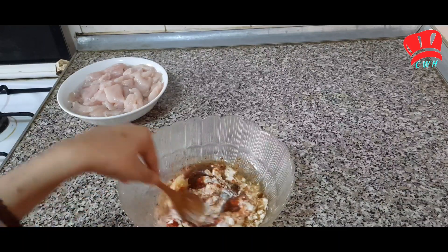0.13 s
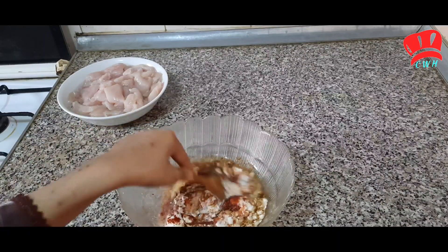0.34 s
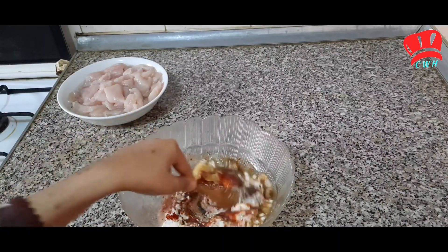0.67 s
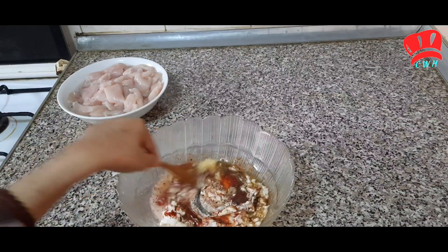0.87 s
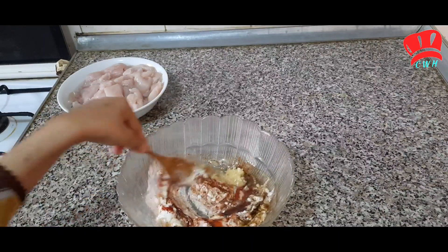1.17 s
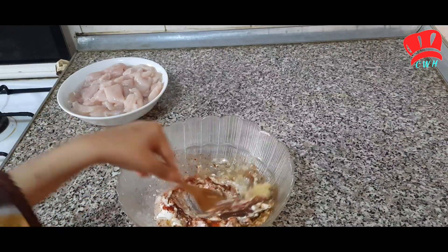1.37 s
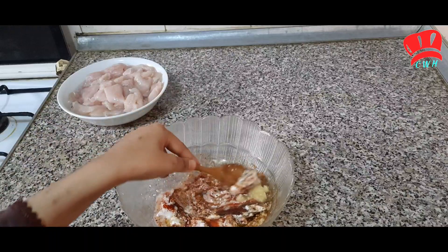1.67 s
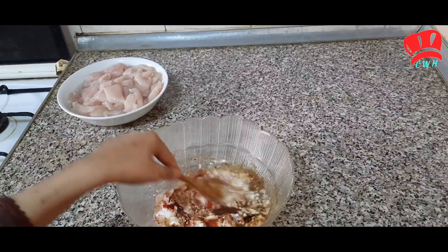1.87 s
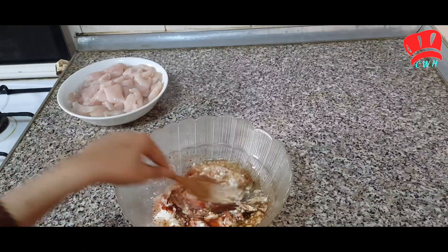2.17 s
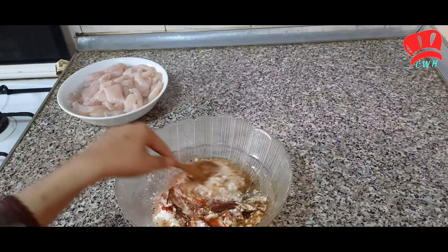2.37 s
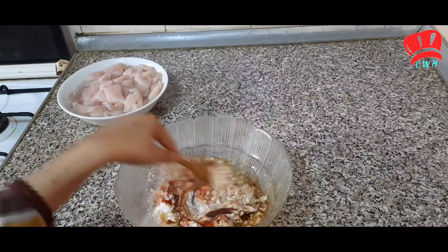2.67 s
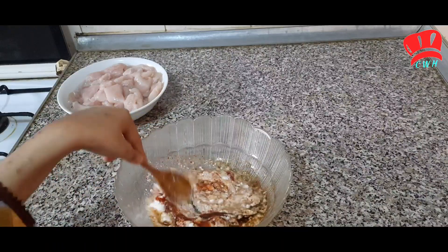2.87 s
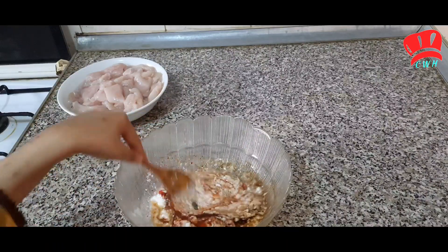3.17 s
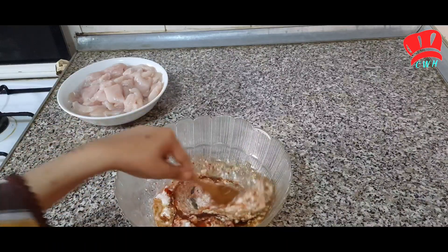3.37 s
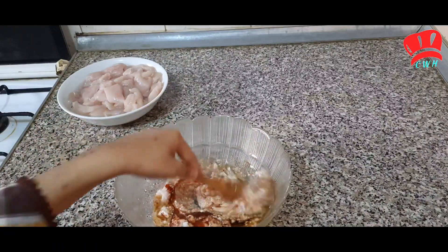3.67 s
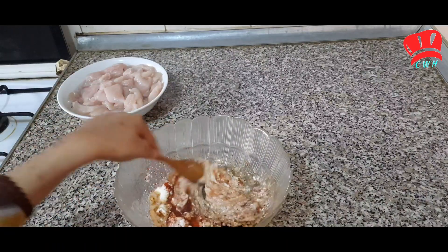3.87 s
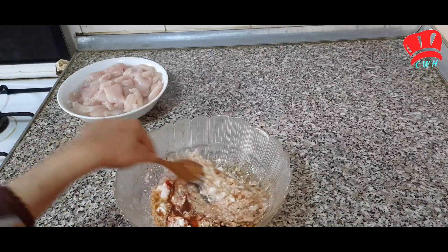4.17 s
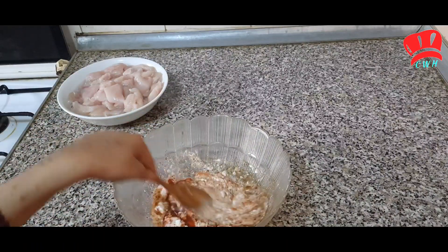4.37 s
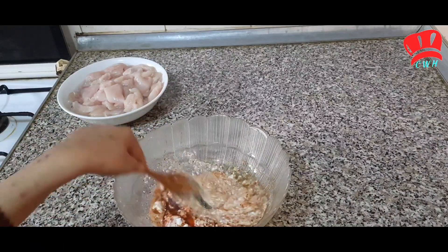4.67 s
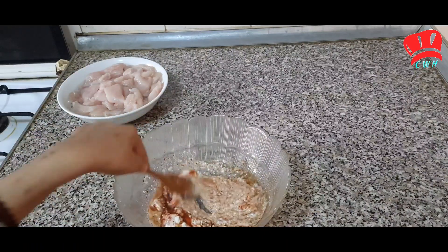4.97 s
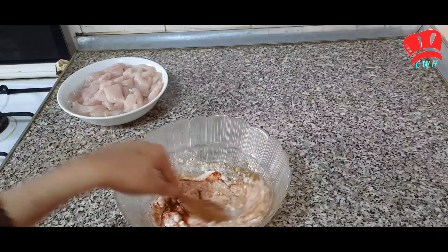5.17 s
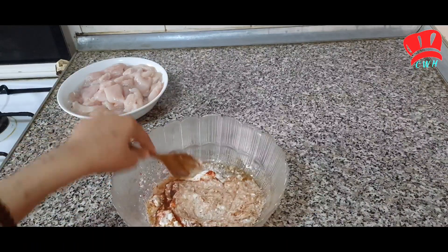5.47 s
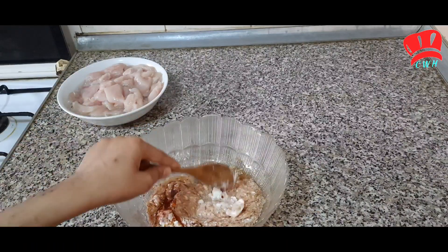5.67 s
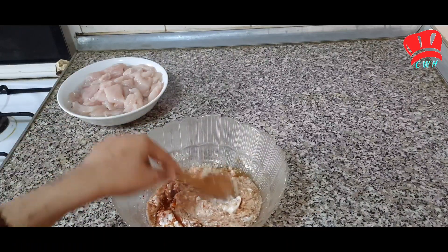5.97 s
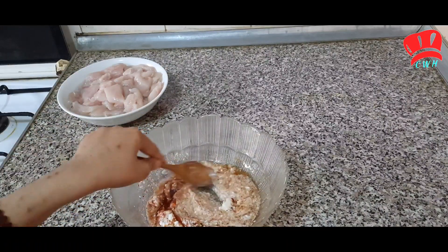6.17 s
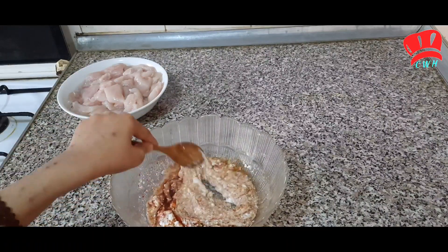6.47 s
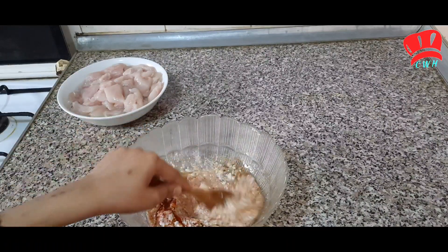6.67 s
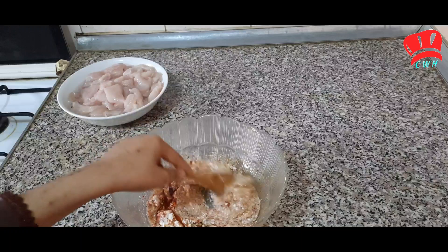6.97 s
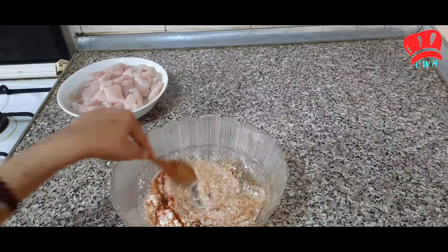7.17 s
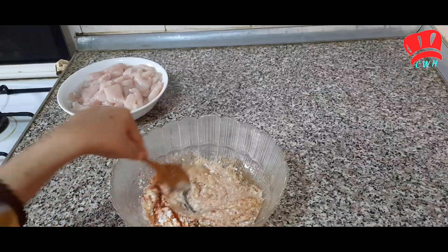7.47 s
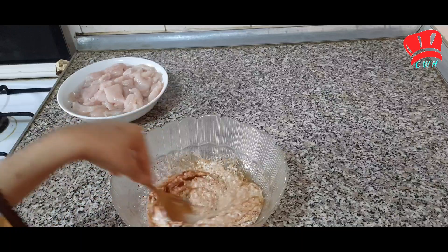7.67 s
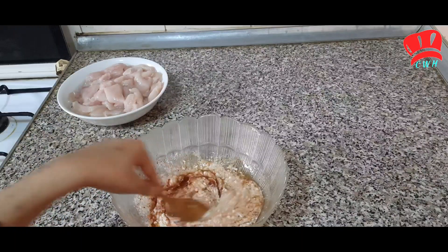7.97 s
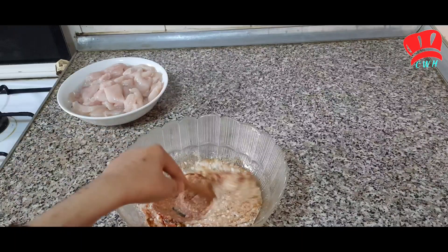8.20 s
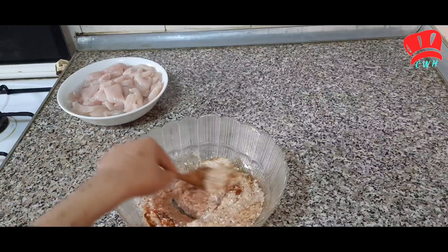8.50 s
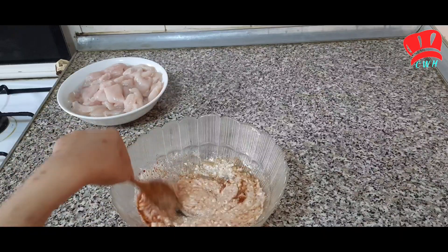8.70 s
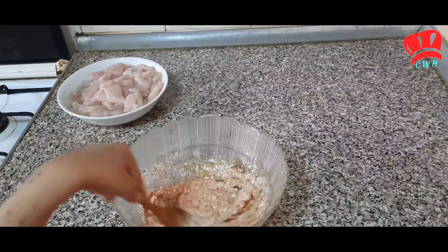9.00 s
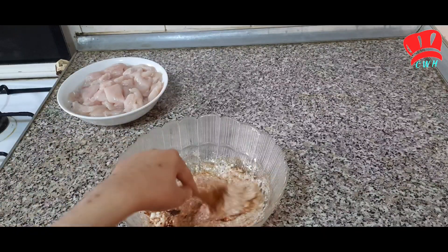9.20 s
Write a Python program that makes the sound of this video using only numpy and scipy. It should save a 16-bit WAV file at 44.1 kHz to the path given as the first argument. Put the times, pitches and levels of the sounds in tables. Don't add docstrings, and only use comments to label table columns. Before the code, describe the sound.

Wet, gluey stirring heard from very near: the spoon drags, fizzes and slaps through marinade, tearing sticky strands and popping air pockets, with tiny gritty clicks on the glass. The bowl bumps softly on the counter throughout, with a heavy knock at about five and a half seconds, then lighter stirring to the end. Short kitchen reflections, low mains hum and a very faint high whine surround it.

```python
import sys
import numpy as np
from scipy import signal
from scipy.fft import rfft, irfft, next_fast_len
from scipy.io import wavfile
from scipy.ndimage import uniform_filter1d

SR = 44100
rng = np.random.default_rng(int(sys.argv[2]) if len(sys.argv) > 2 else 0)


def amp(db):
    return 10 ** (np.asarray(db, float) / 20)


def write(x):
    x = np.atleast_2d(x).T
    wavfile.write(sys.argv[1], SR, np.round(np.clip(x, -1, 1) * 32767).astype(np.int16))


N = 411894

# [pitch_hz, density_db]
AIR = [(30, -25), (58, 6.5), (80, -6), (102, 13), (125, -3.5), (197, -6.5), (325, 3.5), (484, -5.5),
       (637, 0.5), (926, -11.5), (1600, -14), (2510, -17.5), (5500, -20), (13700, -25), (15500, -22.5)]
AIR_DB, MAINS_DB, WHINE_DB = -62, -69, -84.5
MAINS_HZ, WHINE_HZ, WHINE_ENDS_S = 100, 13873, 6.9

# [pitch_hz, likeness (1 = same)]
PORT_LIKENESS = [(60, 0.83), (180, 0.93), (550, 0.1), (1650, -2.4), (4970, -1), (15000, -0.37)]
# [pitch_hz, t60_s]
KITCHEN_DECAY = [(100, 0.15), (700, 0.35), (1840, 0.29), (4850, 0.23), (12800, 0.17)]
# [delay_s, level_db]
WALL_ECHOES = [(.0055, -2.5), (.009, -10.5), (0.015, -60), (0.019, -49)]
BUNCH_S, BUNCH_DB = 0.024, 2.5

# [pitch_hz, level_db, t60_s]
COUNTER_MODES = [(106.7, 6.5, 0.12), (155.4, 3, 0.13), (237.6, 2, 0.093), (310, -2, 0.21),
                 (380.2, 1, 0.098), (533, -25, 0.15), (651.5, -17.5, 0.1), (717, -25.5, 0.29),
                 (831, -25.5, 0.14), (964, -35.5, 0.43), (1500, -34, 0.24), (2230, -33.5, 0.15)]
# [start_s, peak_db, loudest_pitch_hz, hardness_db, depth_db]
BUMPS = [(0.339, -42.5, 310, -26, -32), (0.661, -33, 128, -16, -17), (0.976, -37, 200, -18, -26),
         (1.363, -40.5, 430, 5, -8), (1.602, -42, 152, 7, -6), (2.141, -22.5, 160, -16, -23),
         (2.441, -32, 250, -14.5, -34), (2.742, -33.5, 133, -36, -51), (2.765, -25, 148, -19.5, -18),
         (3.06, -39, 165, -6.5, -22), (3.383, -43, 135, -16, -12), (3.706, -30.5, 104, -11, -4),
         (3.991, -40.5, 290, -7, -10), (4.177, -41.5, 130, 0, -27), (5.556, -15.5, 161, -17, -41),
         (5.577, -25.5, 238, -18, -25), (5.842, -43.5, 383, -13, -22), (6.372, -41.5, 125, -24, -13),
         (7.267, -36.5, 146, -3, -20), (8.255, -34, 385, -2, -9), (8.299, -33.5, 141, 12, -10),
         (8.918, -31, 249, -1, -52)]
# [start_s, peak_db]
NUDGES = [(0.103, -44.5), (0.697, -32), (0.721, -33), (1.04, -51), (1.291, -45), (2.65, -42), (2.91, -46),
          (3.219, -41), (3.312, -35.5), (3.884, -43.5), (4.332, -37.5), (4.595, -36.5), (4.877, -40.5),
          (5.15, -31.5), (7.981, -45.5), (8.446, -37)]
NUDGE_HZ, NUDGE_HARD_DB, NUDGE_DEEP_DB = 105, -31.5, -6
NUDGE_S = 0.0211
DIP_HZ, DIP_Q = 77.5, 2.85

# [pitch_hz, density_db]
ROCKING = [(40, -43), (58, -37), (80, -10), (105, -2), (150, -10.5), (195, -10), (235, -23), (305, -6),
           (480, -17), (650, -17.5), (900, -33), (1400, -69)]
# [start_s, level_db]
SHIFTS = [
    (0.699, -53),
    (2.155, -38),
    (5.575, -31.5),
    (8.946, -41.5),
    (9.251, -61),
]
SETTLE_S, SWAY_DB = 0.028, -73.5

# [pitch_hz, width_hz, level_db]
BOWL_MODES = [(888, 600, 1.5), (1560, 600, 2.5), (2000, 160, -47), (2190, 410, 1.5), (3650, 605, 2.5),
              (5120, 1360, -2.5)]
# [pitch_hz, density_db]
FIZZ = [(2500, -8), (4000, -1), (6500, 11.5), (10000, 4.5), (14000, 8.5), (16000, -36)]
# [full_effort_s, drag_db, drag_pitch_hz, fizz_db, ease_off_s]
STROKES = [(0.1, -53, 1870, -63, 0.21), (0.7, -59.5, 1710, -61, 1), (1.115, -60, 1610, -61, 0.31),
           (1.46, -58, 1510, -57.5, 0.12), (1.648, -85, 1500, -79, 0.054), (2.143, -41, 1500, -53, 0.069),
           (2.441, -55, 1840, -67, 0.6), (2.729, -54.5, 1690, -62, 1), (3.03, -60, 2680, -53, 0.098),
           (3.101, -56, 1630, -69, 0.97), (3.6, -58, 2130, -64, 0.6), (4.01, -56, 2100, -78, 0.79),
           (4.44, -65, 2200, -58, 0.31), (4.69, -56, 2000, -53.5, 0.4), (5.172, -52, 1980, -48, 0.042),
           (5.557, -47.5, 1640, -105, 0.07), (6.134, -51, 1500, -48.5, 0.081),
           (6.376, -46, 1660, -74, 0.07), (6.842, -62, 1560, -78, 0.48), (6.96, -56.5, 1570, -58.5, 0.21),
           (7.21, -106.5, 1420, -53.5, 0.4), (7.938, -58.5, 2350, -59, 0.54), (8.27, -49, 2000, -56, 0.21),
           (8.699, -58, 1420, -84, 0.9), (8.935, -52.5, 2580, -49, 0.048), (9.287, -55, 1460, -77, 0.66)]
DIG_S, EASE_DB = 0.012, 13.5
IDLE_DRAG_DB, IDLE_FIZZ_DB = -88, -84
LUMPS_DB = 3
# [start_s, length_s, level_db, from_hz, to_hz]
SLIDES = [(1.107, 0.088, -63, 1310, 2420), (1.336, 0.16, -66, 1500, 1540), (1.486, 0.09, -66, 1600, 1510),
          (2.71, 0.25, -70, 1450, 1680), (2.79, 0.19, -74, 2280, 2230), (3.024, 0.029, -63, 2700, 2240),
          (3.067, .07, -62, 1750, 1500), (3.15, 0.12, -67, 1400, 1690), (5.546, 0.054, -56, 2200, 2220),
          (6.359, .09, -53, 1980, 1930), (6.388, 0.061, -53, 1520, 1440), (6.67, 0.1, -74, 2300, 2400),
          (6.82, 0.054, -53.5, 1950, 1860), (7.33, 0.34, -77.5, 2430, 2270), (7.595, 0.46, -76, 2580, 2170),
          (0.993, 0.17, -71, 2190, 2160)]
SLIDE_WIDTH_HZ, SLIDE_SKEW = 430, 0.73

# [start_s, peak_db, pitch_hz, left_minus_right_db]
CRACKLES = [(0.1337, -39.5, 2300, 2.5), (0.2474, -45.5, 5220, 4), (0.4658, -38.5, 3550, -1),
            (0.7984, -44, 2420, 8), (0.8866, -57, 2320, 9), (0.9667, -51, 3730, 25.5),
            (0.9966, -45, 6650, 9), (1.285, -53, 2290, -1), (1.3119, -58, 3300, -7),
            (1.3644, -39, 2230, -7), (1.419, -51, 2190, 16.5), (1.5, -47.5, 2800, -3),
            (2.5003, -59, 3510, 0), (2.5222, -41, 2100, -2), (2.632, -61, 1940, -3),
            (2.649, -58, 1910, 0.5), (2.7474, -54, 1800, 2.5), (2.8474, -44, 2300, 0.5),
            (2.9694, -52, 2230, 4), (3.1283, -46, 2370, 2.5), (3.1687, -48, 1960, 4),
            (3.2703, -40, 2650, 1.0), (3.3149, -47, 4000, 20), (3.4062, -48, 2600, 2.0),
            (3.566, -47.5, 1880, -4), (3.7224, -58, 2180, -1), (4.409, -46, 1980, 3.5),
            (4.4644, -40.5, 1980, 1.5), (4.6125, -37.5, 2430, -1), (4.7314, -40, 2250, -4),
            (4.9744, -47, 1760, 2.0), (5.1312, -47, 5960, 0.5), (5.18, -43.5, 2120, -13),
            (5.5268, -83, 2210, -3), (6.1735, -35.5, 1630, 8), (6.1864, -44, 2140, 6),
            (7.0294, -73, 2230, 2.0), (7.0563, -48.5, 2660, 9), (7.8624, -49, 2120, -34),
            (8.2317, -47, 2530, -5), (8.324, -35, 2540, 6), (8.3377, -56, 2620, 2.5),
            (8.37, -38.5, 3200, 2.0), (8.6435, -50, 2300, -1), (8.8039, -49, 2440, 6.5),
            (8.8661, -47.5, 2620, 1), (8.9007, -49, 2295, 0), (9.0194, -61, 2480, 12),
            (9.2407, -47.5, 3200, -2.5)]
# [start_s, peak_db, pitch_hz, left_minus_right_db]
MORE_CRACKLES = [
    (1.42, -38.5, 5400, 0),
    (1.5, -49, 2900, 1),
    (5.6, -55, 3460, 1),
    (2.631, -41.5, 5600, -1),
    (6.8262, -29.5, 3550, -2),
    (7.385, -50, 5100, 3),
    (8, -47.5, 7100, -1),
]
CRACKLE_CYCLES, CRACKLE_SNAP_DB = 1.9, 5.5
# [start_s, peak_db, pitch_hz]
SPITS = [(0.227, -47, 9800), (0.26, -44.5, 10600), (0.4534, -46, 8400), (0.5173, -46, 11400),
         (0.7736, -43.5, 12800), (1.1787, -43, 10900), (1.8394, -53.5, 9220), (2.4987, -46.5, 9640),
         (2.536, -40.5, 8310), (2.6494, -43.5, 11600), (2.7207, -49, 11800), (2.804, -49, 10600),
         (3.1692, -64, 8510), (3.27, -41, 12300), (3.2944, -47, 8110), (3.338, -52, 6500),
         (3.3822, -46.5, 6580), (3.459, -48, 6900), (3.6244, -58, 8750), (3.6844, -52, 7680),
         (3.707, -48, 12400), (3.7594, -48.5, 6850), (3.9055, -51, 10700), (4.4624, -49, 9400),
         (4.9496, -51, 11400), (4.9744, -57, 9680), (5.5268, -47, 11400), (5.818, -54, 11900),
         (5.8794, -52.5, 7290), (6.877, -51, 8340), (6.9531, -49, 11200), (7.0, -48, 10700),
         (7.0294, -55, 10700), (7.0594, -45, 9700), (7.2335, -46, 12900), (7.2604, -47, 12100),
         (7.456, -65, 10500), (7.554, -55, 11100), (7.6271, -56.5, 7580), (7.8157, -52.5, 9100),
         (7.862, -51, 7840), (7.9334, -50, 8580), (7.9693, -46, 11400), (8.324, -42, 8160),
         (9.148, -52, 11500), (9.248, -50, 8040)]
# [start_s, peak_db, pitch_hz]
FILMS = [(0.0861, -47, 9600), (1.041, -43, 12300), (1.103, -48, 9900), (1.3278, -45.5, 11100),
         (1.652, -51, 9000), (1.8936, -48, 14650), (2.1296, -39.5, 9100), (2.623, -48, 11000),
         (2.6993, -48, 8240), (2.9334, -45, 10600), (3.2181, -42, 9000), (3.5783, -48.5, 9050),
         (3.9957, -46, 8900), (4.764, -43, 11200), (5.1642, -45, 10300), (5.6266, -46, 11000),
         (6.053, -44.5, 11700), (6.351, -55, 14400), (6.3639, -36.5, 10500), (6.7206, -48, 10400),
         (7.2, -39.5, 12800), (8.1938, -50, 11100), (8.455, -44, 13000)]
# [start_s, peak_db]
STRANDS = [(0.3454, -48.5), (0.5722, -49.5), (0.6917, -40.5), (2.1304, -43.5), (2.426, -47),
           (3.6023, -40.5), (4.017, -48), (4.179, -46), (4.22, -49), (4.2314, -43), (4.427, -47.5),
           (4.4962, -50), (4.57, -48), (4.6763, -48.5), (4.8293, -52), (6.118, -43), (6.4065, -39),
           (6.827, -85), (8.0952, -41), (8.246, -45.5), (8.431, -49), (8.689, -46.5), (8.9244, -44.5)]
STRAND_HZ = 5760

# [start_s, peak_db, pitch_hz, glass_knock_db]
POPS = [(1.101, -45, 1330, 5.5), (1.454, -41, 1480, -1.5), (2.131, -57, 700, 7), (2.536, -50.5, 1960, 11.5),
        (2.721, -52, 1450, 3), (2.897, -39, 1630, -27), (3.033, -41, 2650, -9), (3.078, -40.5, 1660, -30),
        (3.197, -41.5, 1720, -27), (3.382, -48, 1710, -6), (4.026, -47, 2190, -3), (4.093, -67, 2190, -10),
        (4.24, -39, 3880, -2), (4.43, -38, 1920, -27), (4.498, -43.5, 1590, 1), (4.575, -37, 2660, -13),
        (4.676, -43, 864, 9.5), (4.829, -39, 3200, -6), (5.164, -41, 4300, -24), (5.543, -38.5, 805, 2),
        (6.826, -33.5, 1555, -11), (6.94, -43, 1560, -7), (7.453, -43, 2600, -31), (8.924, -32, 2170, 3),
        (9.15, -48, 1400, -2.5), (9.275, -49, 1520, 4.5), (9.326, -47, 1370, 6.5)]
# [start_s, peak_db, pitch_hz, glass_knock_db]
SMACKS = [(0.088, -52.5, 1310, 10.5), (0.347, -44.5, 840, 0.5), (0.441, -53, 2580, 10),
          (0.776, -40, 1370, -2), (1.327, -44, 1580, 5), (1.469, -37.5, 1550, -8),
          (1.6383, -44.5, 1260, -2.5), (2.143, -32, 800, -6), (2.427, -48, 2250, 11),
          (3.218, -31.5, 3130, -12.5), (3.464, -41, 1190, -3), (3.585, -45.5, 1810, 2.5),
          (3.708, -40, 1250, -8), (3.752, -41, 2760, -4), (4.002, -55, 1170, 10), (4.105, -34.5, 2090, -23),
          (4.179, -35, 2300, -4), (4.764, -36, 1580, -11), (4.951, -41, 1760, -2.5),
          (5.552, -25.5, 970, -51), (5.835, -43.5, 650, -16), (6.364, -26, 1870, -14.5),
          (6.598, -40, 1430, -7.5), (7.275, -43.5, 1500, 2.5), (7.735, -55.5, 2240, 3.5),
          (8.248, -33, 2420, -4.5), (8.433, -38, 2000, -2.5), (8.661, -42.5, 1730, 3),
          (8.691, -33.5, 1660, -6)]
# [start_s, peak_db, pitch_hz, glass_knock_db, cycles]
SQUELCHES = [(0.6923, -56.5, 1590, 8, 9.7), (1.183, -38, 2400, -6, 1.3), (2.7997, -51, 1560, -25, 2.4),
             (2.924, -41, 1770, -11, 0.97), (3.051, -59, 2250, 14, 6.5), (5.913, -55, 1630, 2.5, 3.2),
             (6.117, -45, 2167, -6, 11), (6.6982, -41.5, 1280, -20, 0.33), (7.2, -46, 3930, -21, 4.5),
             (7.3343, -44, 2450, 0.5, 3.7), (7.355, -40.5, 2330, -16, 5.3), (4.347, -53.5, 2340, -1, 6),
             (7.6076, -51.5, 2750, -5, 4.4), (7.9244, -44, 2840, -1, 2), (7.9499, -45, 3100, -7, 2.4),
             (8.272, -32.5, 1696, -48, 3.9), (8.8191, -45, 2500, -25, 2.9)]
SMACK_CYCLES, POP_CYCLES = 0.79, 2.25

# [above_hz, threshold_db]
GATES = [(9000, -72), (3500, -69), (1700, -71)]
GATE_SLOPE, EDGE_HZ = 1.1, 15750


def evened(x):
    return x / np.sqrt(np.mean(x ** 2) + 1e-20)


def read(points, hz):
    f, value = np.transpose(points)
    return np.interp(np.log(hz + 1), np.log(f + 1), value)


def add(mix, s, sound):
    part = mix[..., round(s * SR):][..., :sound.shape[-1]]
    part += sound[..., :part.shape[-1]]


def colour(x, points):
    size = next_fast_len(N)
    gain = amp(read(points, np.fft.rfftfreq(size, 1 / SR)))
    return evened(irfft(rfft(x, size) * gain, size)[..., :N])


def resonate(x, hz, width):
    turn = np.exp(2j * np.pi * np.cumsum(hz * np.ones(len(x))) / SR)
    r = np.exp(-np.pi * width / SR)
    return 2 * (turn * signal.lfilter([1 - r], [1, -r], x / turn + 1e-18)).real


def left_right(db):
    return np.array([[1], [-1]]) * db


def ports(x):
    size = next_fast_len(N)
    same = np.clip(read(PORT_LIKENESS, np.fft.rfftfreq(size, 1 / SR)), 0, 1)
    left, right = rfft(x, size)
    mid = np.sqrt(1 + same) * (left + right) / 2
    side = np.sqrt(1 - same) * (left - right) / 2
    return irfft(np.array([mid + side, mid - side]), size)[:, :N]


def hush():
    t = np.arange(N) / SR
    swell = evened(sum(np.sin(2 * np.pi * (f * t + rng.random())) / np.sqrt(f)
                       for f in np.geomspace(0.2, 8, 20)))
    air = amp(AIR_DB + 0.6 * swell) * colour(rng.standard_normal((2, N)), AIR)
    hum = amp(MAINS_DB) * np.sin(2 * np.pi * MAINS_HZ * t)
    whine_db = WHINE_DB + 1.8 * swell - 21 * (t > WHINE_ENDS_S)
    whine = amp(whine_db) * np.sin(2 * np.pi * WHINE_HZ * t)
    return ports(air) + hum + whine


def kitchen(x):
    out, size = np.zeros((2, N)), SR // 2
    turn = 2 * np.pi * 1.3 * np.arange(N) / SR
    for k in range(3):
        taps = np.zeros((2, size))
        at = np.arange(40, size - 12, 12)
        at = at + rng.integers(0, 12, (2, len(at)))
        np.put_along_axis(taps, at, rng.choice([-1., 1.], at.shape), 1)
        hz, t, z = signal.stft(taps, SR, nperseg=128)
        z = z * amp(BUNCH_DB * np.cos(2 * np.pi * t / (BUNCH_S * (1 + k / 5))))
        decay_db = -60 * np.maximum(t - 0.015, 0) / read(KITCHEN_DECAY, hz)[:, None]
        tail = signal.istft(z * amp(decay_db), SR, nperseg=128)[1]
        tail = amp(5.5) * tail / np.linalg.norm(tail[0])
        for s, db in WALL_ECHOES:
            at_ports = (SR * s * rng.uniform(0.95, 1.05, 2)).astype(int)
            tail[[0, 1], at_ports] += amp(db)
        share = np.sqrt(2 / 3) * np.cos(turn + k * np.pi / 3)
        out += signal.fftconvolve((x * share)[None], tail, axes=1)[:, :N]
    lean = out[0] - signal.lfilter(*signal.butter(1, 300, fs=SR), out[0])
    out[0] += 0.29 * lean + 0.5 * resonate(out[0], 750, 350)
    return ports(out)


def bumps():
    out, t = np.zeros(N), np.arange(SR // 3) / SR
    rows = [(*row, 0) for row in BUMPS]
    rows += [(*row, NUDGE_HZ, NUDGE_HARD_DB, NUDGE_DEEP_DB, NUDGE_S) for row in NUDGES]
    phases = rng.uniform(-0.21, 0.11, (len(rows), len(COUNTER_MODES)))
    for (s, db, pitch_hz, hard_db, deep_db, rise_s), turn in zip(rows, phases):
        ring = amp(deep_db + 4.5 - 60 * t / 0.18) * np.sin(2 * np.pi * 58 * t)
        for (hz, mode_db, t60), phase in zip(COUNTER_MODES, turn):
            near_db = -6 * abs(np.log2(hz / pitch_hz)) if hz < 450 else min(hard_db, -4) + 18.5
            ring = ring + amp(mode_db + near_db - 60 * t / t60) * np.sin(2 * np.pi * (hz * t + phase))
        ring = ring * (1 - np.exp(-(t / rise_s) ** 2 if rise_s else -t / 0.0057))
        add(out, s - 0.004 - rise_s / 2, amp(db - 5) * ring / abs(ring).max())
    return out


def pocket(hz, cycles):
    t = np.arange(1500) / SR
    fade = np.exp(-t * hz / np.clip(cycles, 0.4, 30))
    return fade * (1 - fade ** 0.94) * np.sin(2 * np.pi * hz * t * (1 + 0.0011 * (1 - fade)))


def spits():
    out = np.zeros((2, N))
    for s, db, hz in SPITS:
        add(out, s, amp(db + 17.5 + left_right(1.5)) * pocket(hz, 0.66))
    return out


def tears():
    out = np.zeros((2, N))
    rows = list(FILMS) + [(*row, STRAND_HZ) for row in STRANDS]
    for (s, db, hz), pan in zip(rows, rng.uniform(-3.72, 1, len(rows))):
        snap = 1.88 * (7000 / hz) * pocket(8120, 0.24)
        add(out, s, amp(db + 13 + left_right(2 + 4 * pan)) * (pocket(hz, hz / 7500) + snap))
    return out


def crackles():
    out = np.zeros((2, N))
    snap = amp(CRACKLE_SNAP_DB) * pocket(4100, 0.25)
    for s, db, hz, pan_db in list(CRACKLES) + list(MORE_CRACKLES):
        side_db = left_right(0.5 * np.clip(pan_db, -8, 8))
        add(out, s, amp(db + 6.5 + side_db) * (pocket(hz, CRACKLE_CYCLES) + snap))
    return out


def pops():
    out = np.zeros((2, N))
    rows = [(*row, SMACK_CYCLES) for row in SMACKS] + [(*row, POP_CYCLES) for row in POPS]
    rows += list(SQUELCHES)
    chances = rng.uniform(-2.35, 1, (len(rows), 1 + 2 * len(BOWL_MODES)))
    for (s, db, hz, glass_db, cycles), chance in zip(rows, chances):
        pan, tune, where_db = chance[0], 1 + 0.05 * chance[1::2], 4 * chance[2::2]
        glass = sum(amp(mode_db + b) * pocket(f * a, f / (np.pi * width))
                    for (f, width, mode_db), a, b in zip(BOWL_MODES, tune, where_db))
        side_db = left_right(2 + 0.64 * pan)
        add(out, s, amp(db + 6.5 + side_db) * (pocket(hz, cycles) + amp(glass_db) * glass))
    return out


def grit(per_s, spread_db):
    size = amp(spread_db * np.minimum(rng.exponential(1, N), 2.6)) * rng.choice([-1., 1.], N)
    return evened(size * (rng.random(N) < per_s / SR))


def effort(s, peak_db, ease_s, idle_db):
    step = np.arange(0, N / SR, 0.002)
    late = step - np.reshape(s, (-1, 1))
    fall = np.maximum(-late / DIG_S, late / np.reshape(ease_s, (-1, 1)))
    db = np.reshape(peak_db, (-1, 1)) - EASE_DB * fall
    total_db = 10 * np.log10((amp(db) ** 2).sum(0) + amp(idle_db) ** 2)
    return np.interp(np.arange(N) / SR, step, total_db)


def slides(slips):
    out = np.zeros(N)
    for s, length, db, from_hz, to_hz in SLIDES:
        part = slips[round(s * SR):][:round(length * SR)]
        u = np.linspace(0, 1, len(part))
        hz = from_hz * (to_hz / from_hz) ** u
        ring = resonate(resonate(part, hz, SLIDE_WIDTH_HZ), hz, SLIDE_WIDTH_HZ)
        add(out, s, amp(db) * np.sin(np.pi * u ** SLIDE_SKEW) * evened(ring))
    return out


def stirring():
    t = np.arange(N) / SR
    s, drag_db, hz, fizz_db, ease_s = np.transpose(STROKES)
    pull_db = effort(s, drag_db, ease_s, IDLE_DRAG_DB)
    slips = grit(250, 4.5)
    glass = sum(amp(db - 29) * signal.lfilter(*signal.iirpeak(f, f / width, SR), slips)
                for f, width, db in BOWL_MODES)
    drag = resonate(slips, np.interp(t, s, hz), 1870) + glass
    drag = amp(pull_db - 7) * evened(drag) + slides(slips)
    fizz = amp(effort(s, fizz_db, ease_s, IDLE_FIZZ_DB) - 13) * colour(grit(170, 5), FIZZ)
    sway = amp(SWAY_DB + pull_db - pull_db.mean())
    sway = sway + amp(effort(*np.transpose(SHIFTS), SETTLE_S, -99))
    rocking = amp(0.5) * sway * colour(grit(300, 2.85), ROCKING)
    lumps = evened(uniform_filter1d(rng.standard_normal(N), size=600))
    return amp(LUMPS_DB * lumps - LUMPS_DB / 2) * (drag + fizz), rocking


def scene():
    grains, burst, snaps = crackles(), pops(), tears() + spits()
    paste, rocking = stirring()
    slab = signal.lfilter(*signal.iirnotch(DIP_HZ, DIP_Q, SR), bumps() + rocking)
    clicks = amp(-1.5) * burst.mean(0) + amp(-3.5) * snaps.mean(0) + amp(-5) * grains.mean(0)
    near = amp(-2) * (burst + grains) + snaps + amp([[1.5], [-0.5]]) * paste + slab
    far = kitchen(clicks + amp(-4) * paste + amp(-8) * slab)
    return near + far + hush()


def gate(x):
    out, rest = x, x
    for hz, gate_db in GATES:
        treble = signal.sosfiltfilt(signal.butter(3, hz, "high", fs=SR, output="sos"), rest)
        power = abs(uniform_filter1d((treble ** 2).mean(0), size=700))
        level_db = 10 * np.log10(power + 1e-12)
        out = out - treble * (1 - amp(GATE_SLOPE * np.minimum(level_db - gate_db, 0)))
        rest = rest - treble
    return out


def low_pass(x):
    return signal.sosfilt(signal.butter(12, 16500, fs=SR, output="sos"), x)


def record(dry):
    late = np.array([dry[0], np.roll(dry[1], 3)])
    late = signal.lfilter(*signal.butter(5, 46, "high", fs=SR), late)
    mix = signal.oaconvolve(gate(late), signal.firwin(255, EDGE_HZ, fs=SR)[None], "same")
    return low_pass(mix)


dry = scene()
out = record(dry)
write(out)
```